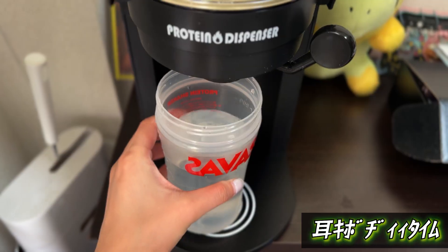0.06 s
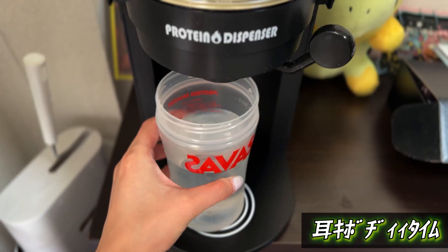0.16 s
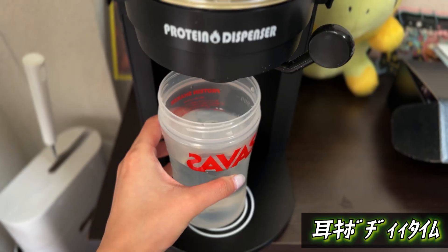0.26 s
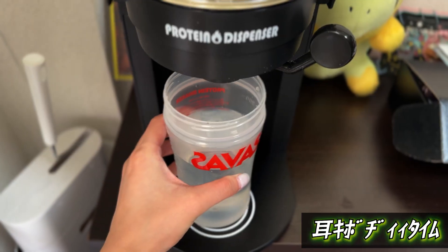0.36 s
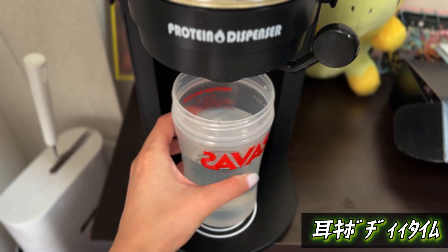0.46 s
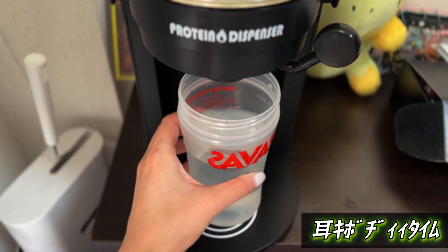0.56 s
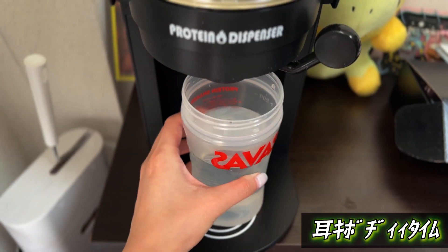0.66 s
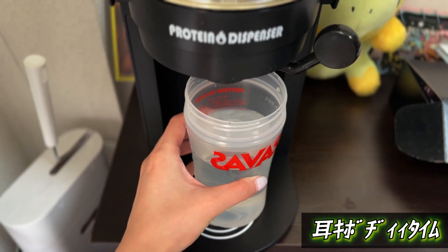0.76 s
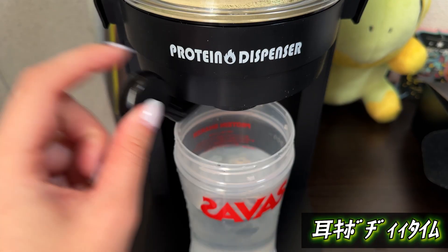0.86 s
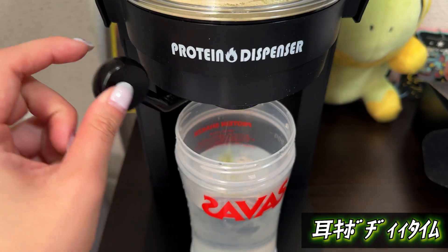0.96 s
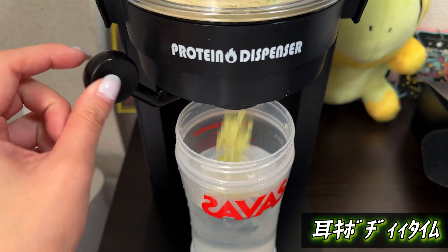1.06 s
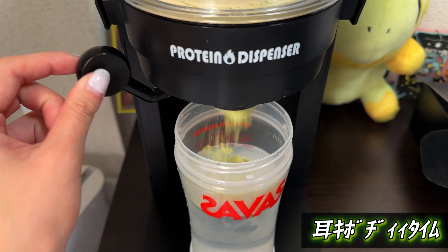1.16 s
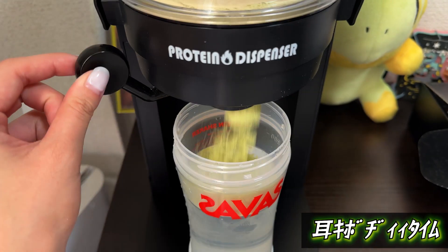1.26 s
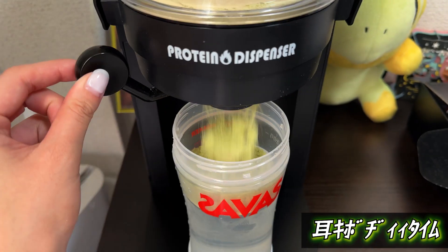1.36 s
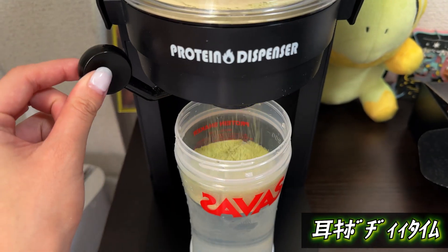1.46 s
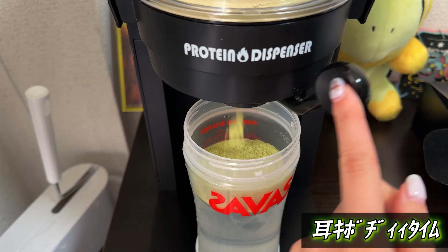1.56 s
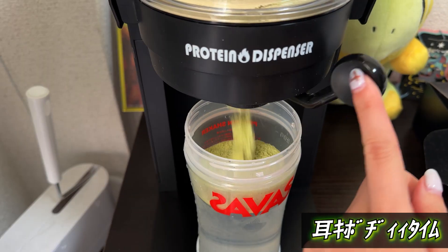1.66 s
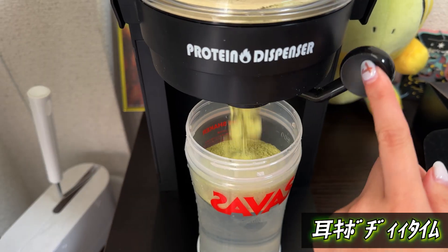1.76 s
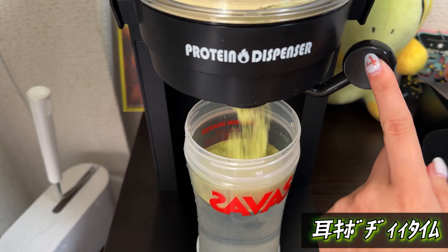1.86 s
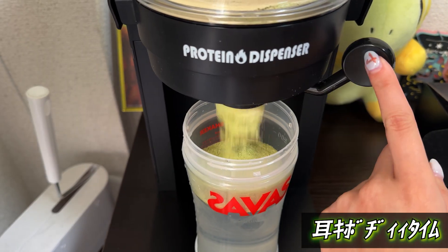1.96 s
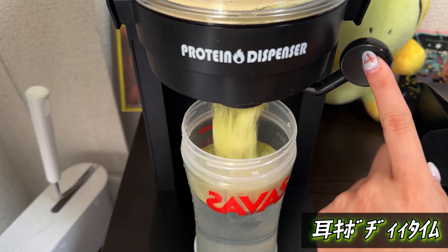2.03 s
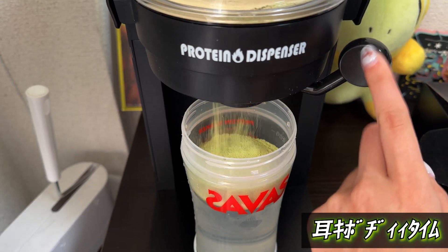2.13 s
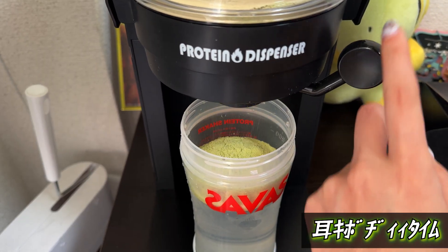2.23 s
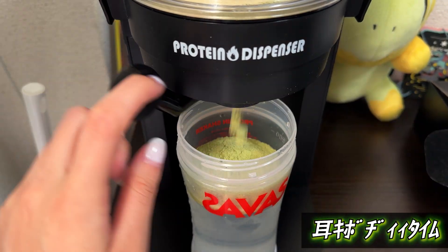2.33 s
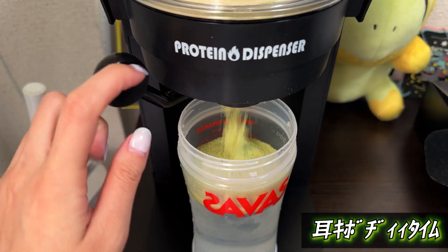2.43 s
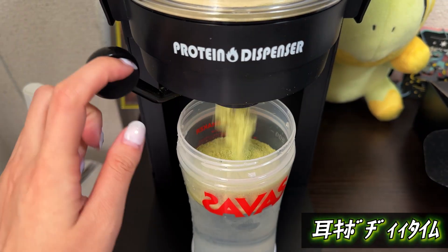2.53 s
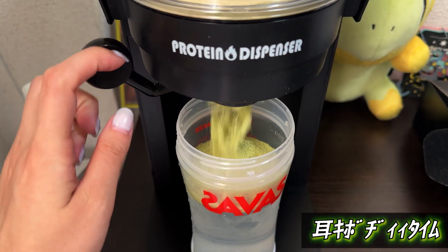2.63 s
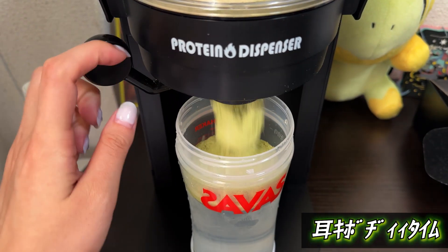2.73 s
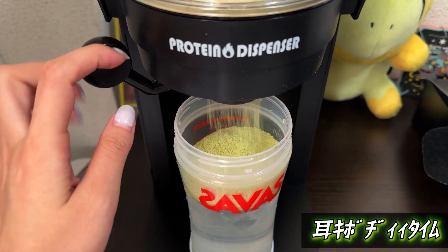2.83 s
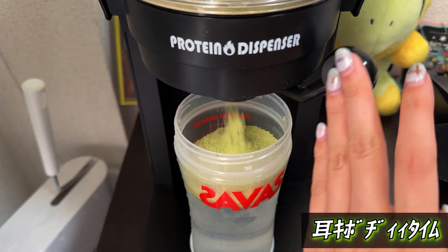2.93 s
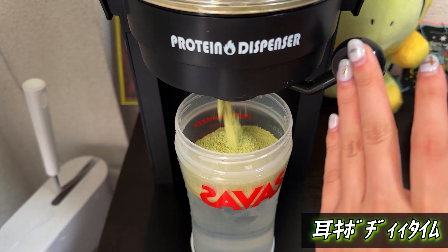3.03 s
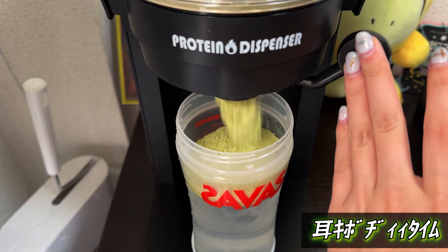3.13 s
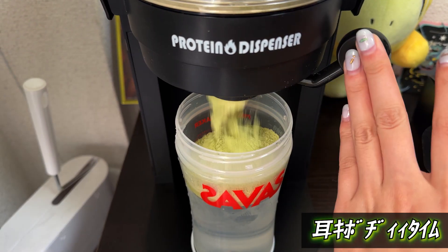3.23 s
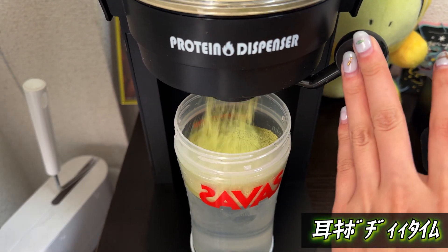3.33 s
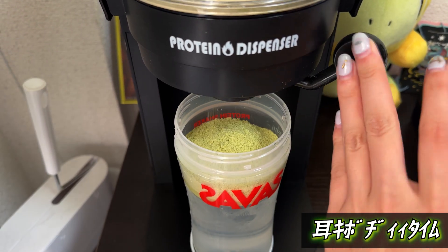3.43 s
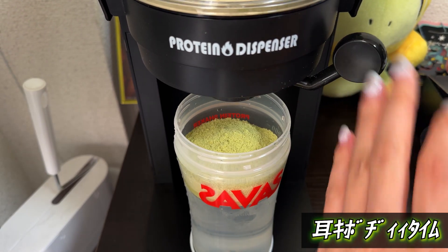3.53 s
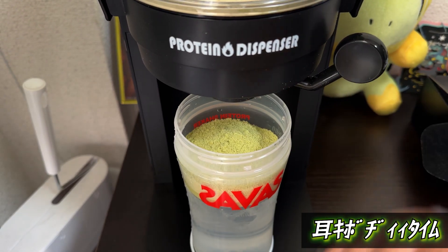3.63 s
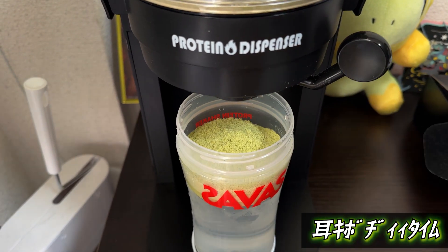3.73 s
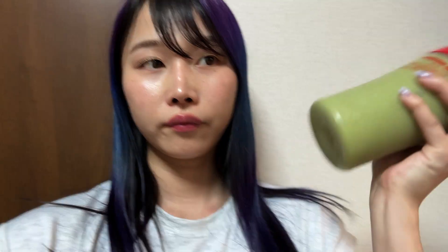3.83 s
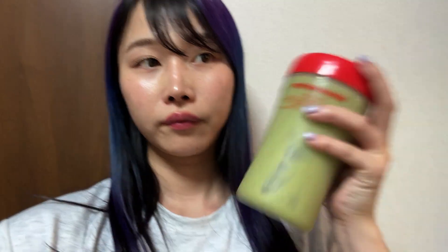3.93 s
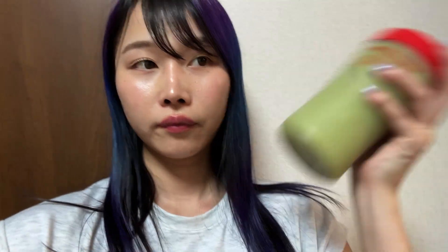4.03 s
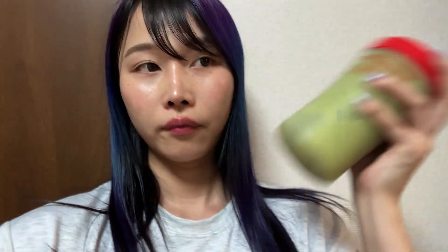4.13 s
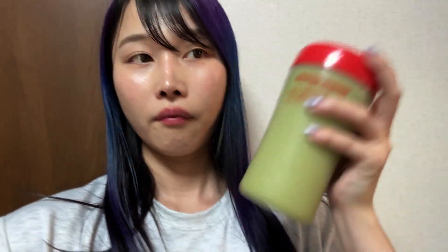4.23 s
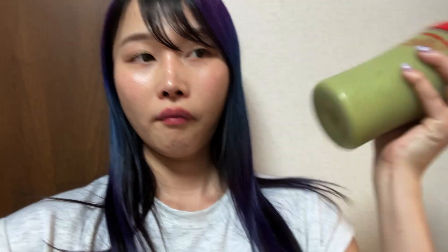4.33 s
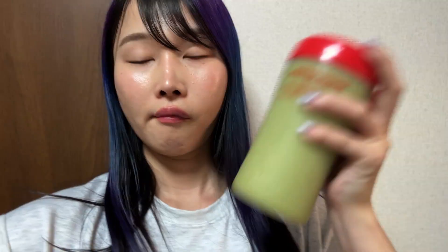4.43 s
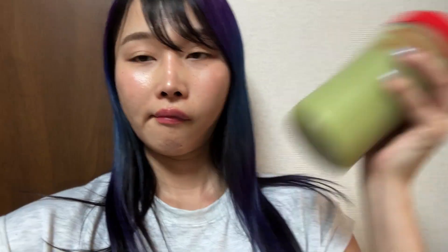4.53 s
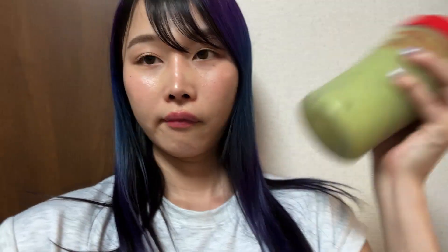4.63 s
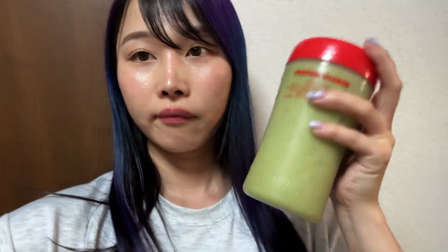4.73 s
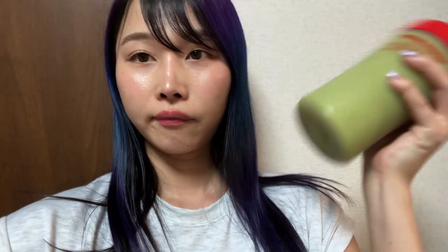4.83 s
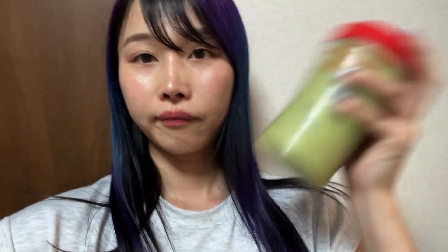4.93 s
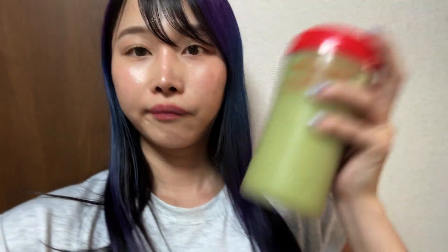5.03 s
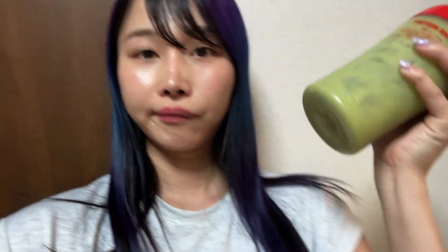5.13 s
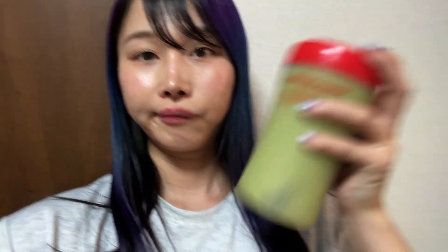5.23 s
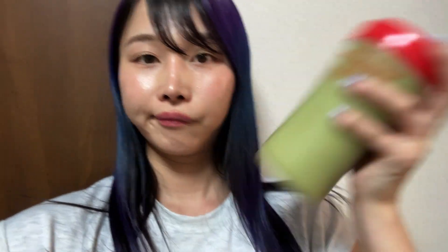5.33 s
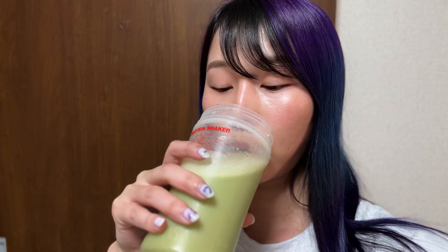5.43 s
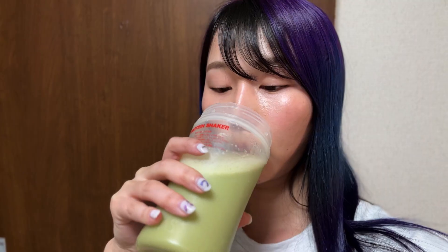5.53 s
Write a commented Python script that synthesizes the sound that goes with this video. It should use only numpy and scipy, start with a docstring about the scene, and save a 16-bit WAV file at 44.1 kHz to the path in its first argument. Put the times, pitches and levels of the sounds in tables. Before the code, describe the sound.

Close-up in a small room: bottle thud, four short gritty lever rasps with hollow plastic knocks, then abrupt sloshing shakes and quiet.

```python
"""A plastic bottle clacks and thuds as it is set on the tray of a powder dispenser. The lever is pushed
across four times: tiny random impacts grind like powder until ringing modes knock as the lever stops.
Then, abruptly, the closed bottle is shaken hard: bubbles and noise follow the drink as it slaps the base
and lid in turn. The shaking stops just as abruptly and leaves the quiet room, made of shaped noise."""
import sys
import numpy as np
from scipy import signal
from scipy.fft import rfft, irfft, next_fast_len
from scipy.io import wavfile
from scipy.ndimage import map_coordinates

SR = 44100
rng = np.random.default_rng(int(sys.argv[2]) if len(sys.argv) > 2 else 0)


def put_to_file(sound):
    """Save the sound as 16-bit audio at rate SR, in the file named by the first command-line argument."""
    columns = np.atleast_2d(sound).T  # one column per channel
    safe = np.clip(columns, -1, 1)
    whole_steps = np.round(safe * 32767)
    wavfile.write(sys.argv[1], SR, whole_steps.astype(np.int16))


N = 246078
TIME = np.arange(N) / SR  # s, the whole scene
AGE = TIME[:SR // 2]  # s since a short sound began
SHAKE_FROM_S, SHAKE_TO_S = 3.819, 5.421


# Lever strokes: [start_s, stop_s, grind_db, extra_at_start_db, click_db, knock_db, bass_tilt_db per octave]
STROKES = [(0.851, 1.1974, -56, 9, -34, -22, 2), (1.615, 1.945, -55.5, 1.5, -34, -30, 7),
           (2.317, 2.6398, -57, 9.5, -25, -19, 2.5), (2.916, 3.1754, -56, 4, -34.5, -25.5, 4.5)]
# Colour of the grinding powder: [pitch_hz, level_db per Hz]
GRIND_COLOUR = [(900, -1.5), (1800, 1.5), (3000, 4.5), (4000, 4.5), (5400, -2), (7500, 2.5), (9000, 2.5),
                (9900, 5.5), (10800, -5), (12300, -7.5), (14000, -4), (16000, 1)]
# Resonances of the housing: [pitch_hz, width_hz, level_db]
HOUSING_PEAKS = [(222.6, 99, -5), (378.6, 51, 2), (550, 300, -6.5), (1031, 51, 1), (1389, 54, -5.5)]
# Dull bumps of powder clumps and of the hand on the housing: [start_s, level_db, pitch_hz]
CLUMPS = [(0.961, -43.5, 168.4), (2.529, -36.5, 326), (3.527, -43.5, 90)]
EMPTY_S = 0.19  # the packed chamber loosens over this time
SQUEEZE_DB, SQUEEZE_S = 4.5, 0.08  # the wheel binds again just before the stop
OVERRUN_S = 0.01  # grinding goes on this long past the stop
HOUSING_DB = 0.7  # compared with the grind


def dosing_wheel():
    """Powder is ground between wheel and housing: a sudden dense rasp that eases as the chamber empties."""
    flow_db = 1.0 * wobble(70)  # the powder feeds unevenly
    rasp = coloured(grit(rate=8000, spread_db=1.0), GRIND_COLOUR, NEAR_LIKENESS)
    rasp = amp(flow_db) * lead(rasp, samples=-3.5) * pan(0.7)
    drone_db = flow_db + 1.2 * wobble(36.0)
    drone = resonant(grit(rate=1000, spread_db=-5.0), HOUSING_PEAKS)
    drone = amp(drone_db) * lead(drone, samples=3.6) * pan(3.6)
    out = np.zeros((2, N))
    for start, stop, grind_db, packed_db, *_ in STROKES:
        packing_db = np.interp(TIME, [start, start + EMPTY_S], [packed_db, 0])
        binding_db = np.interp(TIME, [stop - SQUEEZE_S, stop], [0, SQUEEZE_DB])
        effort_db = packing_db + binding_db
        turning = (TIME > start) * (TIME < stop + OVERRUN_S)
        # the housing drones on more evenly than the rasp
        mixture = amp(effort_db) * rasp + amp(HOUSING_DB + 0.5 * effort_db) * drone
        out += turning * amp(grind_db) * mixture
    for s, db, hz in CLUMPS:
        bump = bubble(hz, cycles=1.9, rise=0, t=AGE)
        add(out, s, amp(db) * bump * (1 - np.exp(-AGE / 0.0019)))
    return in_room(out, wet_db=-15.0)


# Ringing of the knocked housing: [pitch_hz, level_db, time_to_fall_60_db_s]
STOP_MODES = [(234, -26, 0.14), (449, 3, 0.022), (574.6, -9.5, 0.032), (676.7, -1.5, 0.11),
              (921, -2, 0.035), (1170, -21, 0.13), (1383, -4.5, 0.046), (2307, -9, 0.022)]
# Colour of the bright click: [pitch_hz, level_db per Hz]
CLICK_COLOUR = [(600, -4.5), (2000, 4.5), (4500, 2), (6000, -4.5), (9600, 7), (11500, -11), (16000, 0)]
# Colour of the dull thud under the knock: [pitch_hz, level_db per Hz]
THUD_COLOUR = [(120, -28.5), (330, -2.5), (500, 8.5), (750, 4.5), (1400, -23), (1800, -15.5), (2600, -15),
               (4000, -24.5), (7000, -45)]
# First reflections from nearby walls: [delay_s, gain]
WALLS = [(.0095, 0.19), (0.0165, 0.084), (0.021, .07)]


def lever_stops():
    """A bright click of first contact, then the hollow housing knocks and nearby walls answer."""
    clicks, knocks = np.zeros((2, N)), np.zeros((2, N))
    for _, s, _, _, click_db, knock_db, low_db in STROKES:
        add(clicks, s, amp(click_db) * burst(CLICK_COLOUR, t60=0.02, attack=0.001))
        # a few strong modes stand on a dull thud of many damped ones
        modes = amp(-1.5) * ring(STOP_MODES, attack=0.0012, low_db=low_db)
        body = modes + amp(-4.0) * burst(THUD_COLOUR, t60=0.065, attack=0.0016)
        for delay, gain in [(0.0014, 0.95)] + WALLS:
            add(knocks, s + 0.0017 + delay, gain * amp(knock_db) * body * pan(2.5))
    return in_room(lead(clicks, samples=-3.0), wet_db=-17.0) + in_room(knocks, wet_db=-13.5)


# Grains cracking and the loose lever rattling: [start_s, tick_db, rattle_db]
TICKS = [(1.0077, -36, -52), (1.2095, -42, -45.5), (2.127, -55, -70), (2.1626, -48, -52.5),
         (2.1819, -57.5, -39.5), (2.4151, -45, -53.5), (2.4284, -41.5, -62), (2.8098, -46, -56),
         (3.001, -48, -49.5), (3.4579, -59.5, -52.5)]
# Colour of the rattling plastic: [pitch_hz, level_db per Hz]
RATTLE_COLOUR = [(150, -7), (400, 7.5), (700, 3.5), (1100, -2), (1600, -11.5), (2500, -16), (6000, -37),
                 (14000, -43)]
# Ringing of the lever knob: [pitch_hz, level_db, time_to_fall_60_db_s]
KNOB_MODES = [(1006, 1.5, 0.036), (2120, -18, 0.081), (5950, 0, 0.024), (9700, 4, .012), (10560, 7, 0.013),
              (13700, -1, .012)]
FLICK_S = 2.8104  # a fingernail flicks the lever knob


def small_ticks():
    """Sharp ticks with duller plastic rattles, soft rubbing of the lever, and one flick of its knob."""
    out = np.zeros((2, N))
    for s, tick_db, rattle_db in TICKS:
        tick = lead(burst(CLICK_COLOUR, t60=0.028, attack=0.00051), samples=-3.5)
        rattle = burst(RATTLE_COLOUR, t60=0.11, attack=0.00049) * pan(1.9)
        add(out, s, amp(tick_db) * tick)
        add(out, s, amp(rattle_db) * rattle)
    rubbing = coloured(grit(rate=3500, spread_db=-4), RATTLE_COLOUR, NEAR_LIKENESS)
    out += rub_level() * rubbing * pan(3.6)
    out = in_room(out, wet_db=-11)
    # a short dry ping, no room tail
    add(out, FLICK_S, amp(-49) * ring(KNOB_MODES, attack=0.0004) * pan(2.7))
    return out


# The released lever rubs on the housing: [middle_s, level_db, half_length_s]
RUBS = [(2.18, -51.5, 0.024), (3.458, -59, 0.029)]


def rub_level():
    """Each rub of the released lever swells and fades evenly."""
    return sum(amp(db) * np.exp(-((TIME - s) / length) ** 2) for s, db, length in RUBS)


TRICKLE_DB, TRICKLE_FADE_S = -70, 0.095  # stray powder after a stop
SHAKEN_LOOSE_DB = -13.5  # stray powder compared with a rub of the lever


def trickle():
    """Stray grains patter on the plastic after each stop, and whenever the lever rubs."""
    grains = coloured(grit(rate=3000, spread_db=7), CLICK_COLOUR, NEAR_LIKENESS)
    after_stops = sum(envelope(stop, rise=0.005, hold=0.02, fade=TRICKLE_FADE_S)
                      for _, stop, *_ in STROKES)
    level = amp(TRICKLE_DB) * after_stops + amp(SHAKEN_LOOSE_DB) * rub_level()
    return level * in_room(grains, wet_db=-14)


# The bottle lands and rocks: [start_s, rim_clack_db, tray_thud_db, contact_s]
LANDING = [(0.1649, -22.5, -16.5, 0.00038), (0.1714, -12.5, -52, 0.0011), (0.1958, -17, -22, 0.0014),
           (0.3022, -27.5, -29, .0016), (0.468, -49, -48.5, 0.001)]
# Ringing of the bottle's hard rim: [pitch_hz, level_db, time_to_fall_60_db_s]
RIM_MODES = [(964, -2.5, 0.03), (1060, -2.5, 0.037), (1250, -17, 0.047), (1417, -14.5, 0.042),
             (2488, -1.5, 0.018), (2560, -19, .035), (2700, -27, 0.051)]
# Ringing of the tray: [pitch_hz, level_db, time_to_fall_60_db_s]
TRAY_MODES = [(105, -2.5, 0.053), (186.2, -4, 0.22), (226, 3, 0.042), (314, -20.5, 0.17),
              (455, -6.5, 0.035), (563, -20, 0.037)]
# Colour of the crack at first touch: [pitch_hz, level_db per Hz]
CRACK_COLOUR = [(500, 4.5), (1200, -7.5), (1900, -10), (2450, -2), (3200, -15.5), (4400, -9), (5400, -16),
                (6500, -12.5), (9500, -11.5), (12000, -25), (16000, -27)]
# The bottle is nudged into place: [start_s, level_db]
NUDGES = [(0.348, -65), (.49, -64.5), (0.743, -66)]
NUDGE_RISE_S, NUDGE_HOLD_S, NUDGE_FADE_S = 0.015, 0.01, 0.09
TRAY_LAG_S = 0.011  # the water's weight follows the rim
TRAY_ATTACK_S, TRAY_YIELD = 0.0019, 2.9  # the thud's rise lengthens with the contact


def bottle_set_down():
    """The hard rim clacks, the weight of the water thuds on the tray, then the nudged bottle scrapes."""
    clacks, thuds, crack = np.zeros((3, 2, N))
    for s, clack_db, thud_db, contact in LANDING:
        clack = soft(ring(RIM_MODES, attack=0.00038), contact)
        thud = soft(ring(TRAY_MODES, attack=TRAY_ATTACK_S + TRAY_YIELD * contact), 0.00053)
        add(clacks, s, amp(clack_db) * clack * pan(4.2))
        add(thuds, s + TRAY_LAG_S, amp(thud_db) * thud * pan(2.5))
    first_touch = amp(-29.5) * burst(CRACK_COLOUR, t60=0.046, attack=0.00024)
    first_touch += amp(-43) * burst(CLICK_COLOUR, t60=0.012, attack=0.0005)
    add(crack, LANDING[0][0], first_touch)
    # the thud is thinned gently below about 45 Hz
    thuds = filtered(thuds, lambda hz: (1j * hz / (1j * hz + 45)) ** 2)
    # resonances: pitch_hz, width_hz, level_db
    scrape = resonant(grit(rate=630, spread_db=3.5), [(186, 13.6, 9), (1010, 33, -1), (1430, 160, -16.0)])
    clacks += scrape * sum(amp(db) * envelope(s, NUDGE_RISE_S, NUDGE_HOLD_S, NUDGE_FADE_S)
                           for s, db in NUDGES)
    return in_room(lead(clacks, samples=3.6) + lead(crack, samples=-4.0), wet_db=-10) + thuds


# Large air pockets closing: [start_s, level_db, pitch_hz]
GLUGS = [(3.955, -20, 680), (4.031, -29, 706), (4.223, -20, 273), (4.743, -20.5, 294), (4.772, -14, 624),
         (5.018, -23.5, 327), (5.048, -20.5, 607), (5.357, -21.5, 780)]
# Gouts of drink smack the plastic: [start_s, level_db]
GOUTS = [(3.929, -35.5), (4.1837, -35.5), (4.258, -35), (4.687, -44), (4.789, -30.5), (4.885, -42),
         (4.954, -40), (5.0187, -30), (5.2256, -39), (5.287, -32)]
# Colours of gulped air, splashes, foam spray and smacks: [pitch_hz, level_db per Hz]
GULP_COLOUR = [(60, -34), (150, -10.5), (290, -5), (450, -3.5), (650, 3), (850, -0.5), (1400, -13)]
SPLASH_COLOUR = [(350, -68), (750, 8), (1300, 8), (2100, 13), (2800, -2.5), (5000, -41)]
SPRAY_COLOUR = [(1500, 2.5), (2600, 1), (3800, -1.5), (5000, -2.5), (5700, -4), (6900, -1), (8500, -17.5),
                (11000, -14.5), (13500, -13.5), (16000, -19)]
SLAP_COLOUR = [(300, -7), (700, 9.5), (1700, -3), (2600, -10), (4500, 3.5), (7000, -5.5), (9500, -16),
               (14000, -13)]
# How alike left and right are inside the shaken bottle's sound: [pitch_hz, likeness (1 = the same)]
WIDE_LIKENESS = [(200, 1), (550, 0.6), (1300, 0.98), (3000, 0.3), (7000, 0.15), (12000, 0.71)]
# the air cavity grows: (from Hz, to Hz, length s)
BASE_SWEEP, LID_SWEEP = (1900, 1020, 0.034), (790, 540, 0.0427)
LID_SWEEP_DB = -3  # compared with the lid surge


def shaking():
    """Each surge gulps air, splashes on the wall and sprays foam, between an abrupt start and end."""
    (gulp, splash, spray), glide = sloshing()
    big = bubbles(rate=330, pitch_hz=480 * glide, octaves=0.612, cycles=5.24, spread_db=6.0)
    big = big + 0.21 * unit(grit(rate=1300, spread_db=-2.5))
    small = bubbles(rate=450, pitch_hz=1300 * glide, octaves=0.44, cycles=5.8, spread_db=2.5)
    small = small + 0.69 * unit(grit(rate=800, spread_db=4.5))
    foam = bubbles(rate=1100, pitch_hz=4200 * np.sqrt(glide), octaves=0.46, cycles=11.8, spread_db=4)
    foam = foam + 1.8 * unit(grit(rate=9000, spread_db=3.0))
    splash = splash * amp(1.15 * wobble(60))  # the drink lands in lumps
    spray = spray * amp(2.1 * wobble(140))  # foam bursts in clusters

    low = gulp * coloured(big, GULP_COLOUR, WIDE_LIKENESS) * pan(-5.0)
    for s, db, hz in GLUGS:
        add(low, s, amp(db) * bubble(hz, cycles=1.48, rise=-0.014, t=AGE) * pan(-4.5))
    for s, _, sweep_db, *_ in BASE_THROWS:
        add(low, s, amp(sweep_db) * swoop(*BASE_SWEEP, width_hz=500) * pan(-1.4))
    for s, db, *_ in LID_THROWS:
        add(low, s, amp(db + LID_SWEEP_DB) * swoop(*LID_SWEEP, width_hz=190) * pan(-3.7))

    splashes = splash * coloured(small, SPLASH_COLOUR, WIDE_LIKENESS) * pan(-2.4)
    sprays = spray * coloured(foam, SPRAY_COLOUR, WIDE_LIKENESS) * pan(2.9)
    out = lead(low, samples=0.5) + lead(splashes, samples=-10) + lead(sprays, samples=-10)
    for s, db in GOUTS:
        add(out, s, amp(db) * burst(SLAP_COLOUR, t60=0.025, attack=0.00019))
    return in_room(out, wet_db=-11) * amp(-1.9) * (TIME > SHAKE_FROM_S) * (TIME < SHAKE_TO_S)


# The drink is thrown against the base, its front first, then its bulk:
# [start_s, front_db, sweep_db, bulk_lag_s, bulk_db]
BASE_THROWS = [(3.925, -44.5, -38.5, .024, -36), (4.176, -41, -39.5, 0.038, -39),
               (4.459, -46, -41.5, 0.016, -36.5), (4.734, -41.5, -56, .033, -37.5),
               (5.006, -41, -44.5, 0.037, -40.5), (5.279, -42, -43.5, 0.011, -39)]
# The drink is thrown back up into the lid: [start_s, level_db, rise_s, hold_s]
LID_THROWS = [(3.813, -41, 0.0052, 0.04), (4.028, -45, .004, 0.0904), (4.31, -40, 0.031, 0.0434),
              (4.589, -40, 0.016, 0.039), (4.88, -39, 0.0068, 0.0085), (5.133, -41, .025, 0.0278),
              (5.353, -45, 0.0035, 0.011), (5.393, -42.5, 0.012, 0.0072)]
FRONT_SHAPE, BULK_SHAPE = (0.0069, 0.02, 0.0134), (0.008, 0.021, 0.029)  # (rise s, hold s, fade s)
LID_FADE_S = 0.0262
# what each kind of surge stirs up: (gulp dB, splash dB, spray dB)
FRONT_MIX, BULK_MIX, LID_MIX = (0.18, -0.7, -3.5), (0.76, -0.85, -2.8), (0.67, -1.84, -1.34)
# Churning between surges: [gulp_db, splash_db, spray_db]
CHURN = (-60.5, -58, -51.5)
# The drink thickens and dulls as it mixes: [gulp, splash, spray, each in dB per second]
THICKEN = (1.5, -0.41, -1.5)


def sloshing():
    """The throws set the levels of gulp, splash and spray, and the pitch of the trapped air."""
    surges = [(s, db, LID_MIX, (rise, hold, LID_FADE_S)) for s, db, rise, hold in LID_THROWS]
    for s, front_db, _, lag, bulk_db in BASE_THROWS:
        surges.append((s, front_db, FRONT_MIX, FRONT_SHAPE))
        surges.append((s + lag, bulk_db, BULK_MIX, BULK_SHAPE))
    power = amp(CHURN)[:, None] ** 2 * np.ones(N)
    progress = np.zeros(N)
    for s, db, mix, (rise, hold, fade) in surges:
        surge = (amp(db) * amp(mix)[:, None] * envelope(s, rise, hold, fade)) ** 2
        power += surge
        progress += surge[1] * np.tanh((TIME - s - rise - hold / 2) / 0.026)
    # the front of a surge traps small pockets, its bulk larger ones: the pitch falls as it lands
    glide = 2 ** (-0.6 * progress / power[1])
    mixed_s = np.clip(TIME, SHAKE_FROM_S, SHAKE_TO_S) - (SHAKE_FROM_S + SHAKE_TO_S) / 2
    return np.sqrt(power) * amp(np.outer(THICKEN, mixed_s)), glide


# Colours of the quiet room, up to the start of the shaking and from then on: [pitch_hz, level_db per Hz]
HUSH_BEFORE = [(25, -21.5), (45, -12), (75, -2), (105, -5.5), (150, -15), (230, -23), (380, -23),
               (550, -40), (1000, -40.5), (2100, -43), (3300, -37.5), (6600, -36), (10000, -51.5),
               (12000, -59)]
HUSH_AFTER = [(24, -83), (40, 0.5), (99, -6.5), (130, -12.5), (237, -7.5), (305, -12.5), (942, -23.5),
              (1340, -33), (2440, -29.5), (2980, -37), (16000, -53)]
# How alike left and right are in the room: [pitch_hz, likeness (1 = the same)]
STILL_LIKENESS = [(100, 0.89), (500, 0.4), (1500, 0.028), (8000, 0.053)]


def room_tone():
    """Low rumble and faint hiss from shaped noise, a little different once the shaking starts."""
    before = coloured(rng.standard_normal((2, N)), HUSH_BEFORE, STILL_LIKENESS)
    after = coloured(rng.standard_normal((2, N)), HUSH_AFTER, STILL_LIKENESS)
    return np.where(TIME < SHAKE_FROM_S, amp(-61) * before * pan(2.3), amp(-59.0) * after * pan(1.2))


# How long the room rings: [pitch_hz, time_to_fall_60_db_s]
ROOM_DECAY = [(150, 0.6), (600, 0.24), (3000, 0.37), (12000, 0.17)]


def in_room(x, wet_db):
    """A sound with the diffuse tail of a small room: noise that dies at its own rate at each pitch."""
    hz, t, z = signal.stft(rng.standard_normal((2, SR // 2)), SR, nperseg=256)
    fading = z * amp(-60 * t / along(ROOM_DECAY, hz)[:, None])
    tail = signal.istft(fading, SR, nperseg=256)[1]
    tail = coloured(tail, [(1000, 0)], STILL_LIKENESS)
    tail = np.pad(tail / np.linalg.norm(tail[0]), ((0, 0), (SR // 200, 0)))  # starts 5 ms late
    return x + amp(wet_db) * signal.fftconvolve(x, tail, axes=1)[:, :N]


# How alike left and right are for close sounds: [pitch_hz, likeness (1 = the same)]
NEAR_LIKENESS = [(200, 1), (600, 0.75), (1300, 0.5), (3000, 0.1), (6500, 0.2), (10000, 1)]


def burst(spectrum, t60, attack):
    """A short dying puff of noise."""
    noise = coloured(rng.standard_normal((2, len(AGE))), spectrum, NEAR_LIKENESS)
    return noise * amp(-60 * AGE / t60) * (1 - np.exp(-AGE / attack))


def resonant(x, peaks):
    """x through (Hz, width Hz, dB) resonances of alternating sign, at rms 1."""
    def body(f):
        return sum((-1) ** k * amp(db) * 1j * f * w / (c * c - f * f + 1j * f * w)
                   for k, (c, w, db) in enumerate(peaks))
    return unit(filtered(coloured(x, [(1000, 0)], NEAR_LIKENESS), body))


def ring(modes, attack, low_db=0):
    """Struck modes at slightly new strengths; low_db tilts them towards the bass, per octave."""
    hz, db, t60 = np.transpose(modes)[:, :, None]
    db = db + rng.normal(0, 1, hz.shape) - low_db * np.log2(hz / np.median(hz))
    sign = (-1) ** np.arange(len(hz))[:, None]
    waves = sign * amp(db - 60 * AGE / t60) * np.sin(2 * np.pi * hz * AGE)
    return np.sum(waves, 0) * (1 - np.exp(-(AGE / attack) ** 2))


def soft(sound, contact):
    """A longer contact (s) leaves the high modes unstruck."""
    return filtered(sound, lambda hz: 1 / (1 + 1j * hz * contact) ** 2)


def grit(rate, spread_db):
    """Two streams of tiny impacts of uneven size, about rate a second."""
    hits = rng.random((2, N)) < rate / SR
    return hits * rng.standard_normal((2, N)) * amp(spread_db * rng.standard_normal((2, N)))


def bubble(hz, cycles, rise, t):
    """An air pocket rings for some cycles while its pitch climbs (negative rise: falls)."""
    life = hz * t / cycles
    tone = np.sin(2 * np.pi * hz * t * (1 + rise * np.minimum(life, 2) / 2))
    return tone * np.exp(-life) * (1 - np.exp(-2 * hz * t))


def bubbles(rate, pitch_hz, octaves, cycles, spread_db):
    """Two streams of bubbles of scattered size, their pitch scattered around a moving centre."""
    count = int(rate * N / SR)
    t = AGE[:SR // 30]
    streams = []
    for _ in range(2):
        start = rng.integers(0, N, (count, 1))
        pitch, size = rng.standard_normal((count, 2)).T[:, :, None]
        hz = np.minimum(pitch_hz[start] * 2 ** (octaves * pitch), SR / 3)
        waves = amp(spread_db * size) * bubble(hz, cycles, 0.057, t)
        places = start + np.arange(len(t))
        streams.append(np.bincount(places.ravel(), waves.ravel(), N)[:N])
    return unit(np.array(streams))


def swoop(from_hz, to_hz, length, width_hz):
    """Turbulence rings a cavity whose pitch falls as it opens."""
    t = AGE[AGE < length]
    centre_hz = from_hz * (to_hz / from_hz) ** (t / length)
    jitter = np.sqrt(2 * np.pi * width_hz / SR) * rng.standard_normal(len(t))
    wave = np.sqrt(2) * np.sin(2 * np.pi * np.cumsum(centre_hz) / SR + np.cumsum(jitter))
    swell = np.sqrt(np.sin(np.pi * t / length))
    return filtered(wave * swell, lambda hz: 1 / (1 + (hz / (2 * from_hz)) ** 4))


def envelope(s, rise, hold, fade):
    """From time s: a straight rise, a hold and an exponential fade."""
    t = TIME - s
    return np.clip(t / rise, 0, 1) * np.exp(-np.maximum(t - rise - hold, 0) / fade)


def wobble(rate):
    """A smooth random curve, rate knots a second."""
    return map_coordinates(rng.standard_normal(int(N * rate / SR) + 4), [TIME * rate])


def coloured(pair, spectrum, alike):
    """Two unrelated signals become a stereo sound of rms 1 with this spectrum and likeness."""
    def response(hz):
        turn = np.arccos(np.clip(along(alike, hz), -1, 1)) / 2
        return amp(along(spectrum, hz)) * [np.cos(turn), np.sin(turn)]
    mid, side = filtered(pair, response)
    return unit(np.array([mid + side, mid - side]))


def lead(x, samples):
    """The sound reaches the left channel earlier than the right (negative: later)."""
    return filtered(x, lambda hz: np.exp(1j * np.pi * hz / SR * samples * np.array([[1], [-1]])))


def pan(db):
    """Gains of the two channels for a left-right difference."""
    return amp([[db / 2], [-db / 2]])


def filtered(x, response):
    """x times a response of frequency."""
    n = x.shape[-1]
    m = next_fast_len(n + 8192)  # spare room at the end for ringing
    return irfft(rfft(x, m) * response(np.fft.rfftfreq(m, 1 / SR)), m)[..., :n]


def along(points, hz):
    """Read between (Hz, value) points on a log axis."""
    f, v = np.transpose(points)
    return np.interp(np.log(hz + 1), np.log(f), v)


def add(track, s, sound):
    """Mix a sound in at time s."""
    start = round(s * SR)
    track[..., start:start + sound.shape[-1]] += sound[..., :N - start]


def amp(db):
    """Decibels to a plain gain."""
    return 10 ** (np.asarray(db) / 20)


def unit(x):
    """Scale to rms 1."""
    return x / np.sqrt(np.mean(x ** 2) + 1e-20)


def scene():
    """The dispenser, the bottle landing and being shaken, and the room behind them."""
    dispenser = dosing_wheel() + lever_stops() + small_ticks() + trickle()
    return dispenser + bottle_set_down() + shaking() + room_tone()


TOP_HZ = 15850


def record(dry):
    """Nothing is kept above the band limit: a straight slope 400 Hz wide ends the treble."""
    return filtered(dry, lambda hz: np.clip((TOP_HZ + 200 - hz) / 400, 0, 1))


dry = scene()
out = record(dry)
put_to_file(out)
```